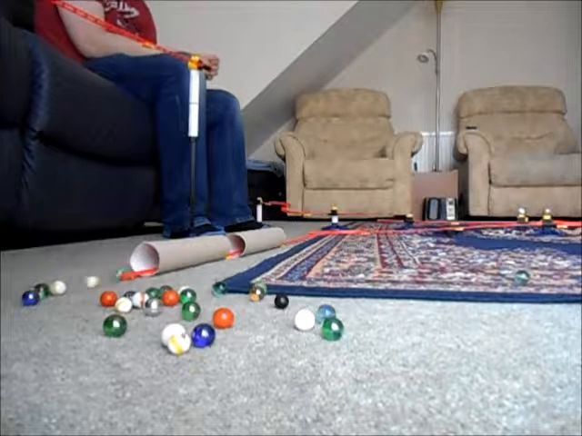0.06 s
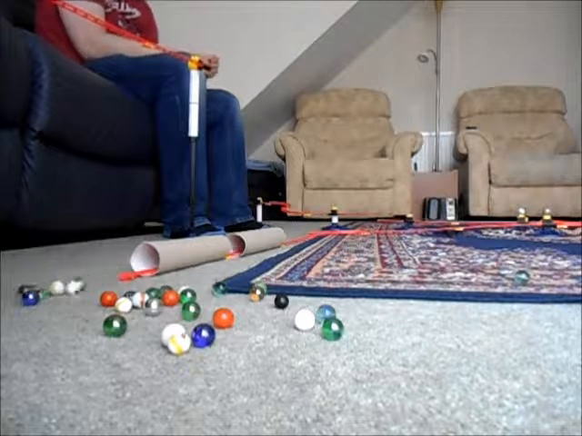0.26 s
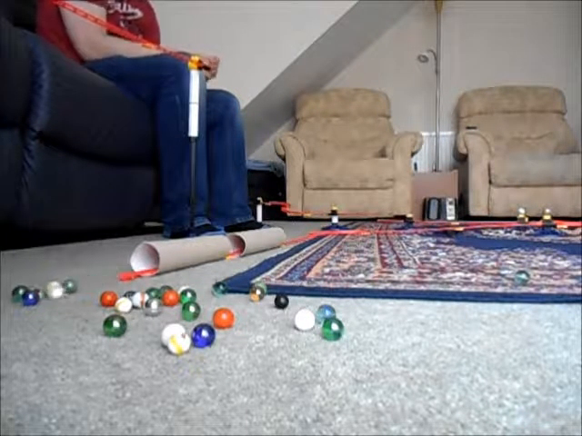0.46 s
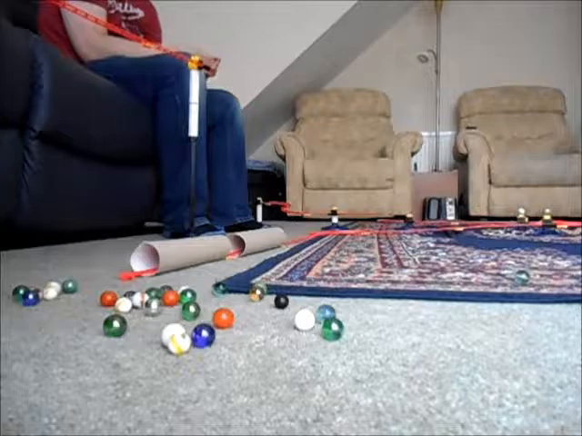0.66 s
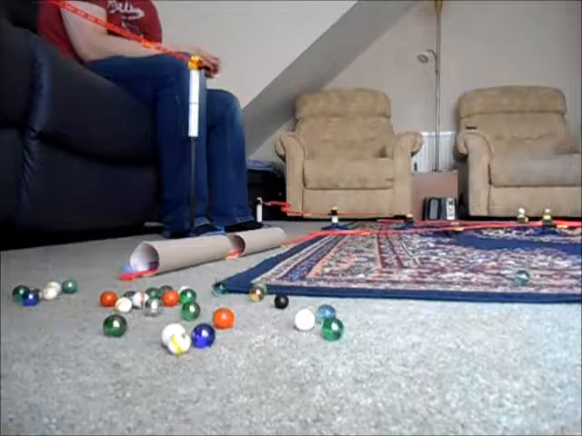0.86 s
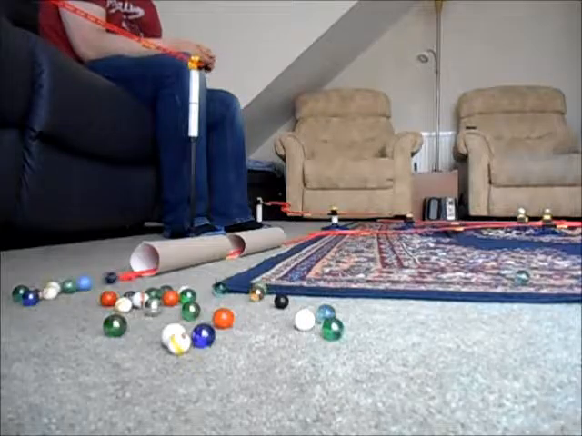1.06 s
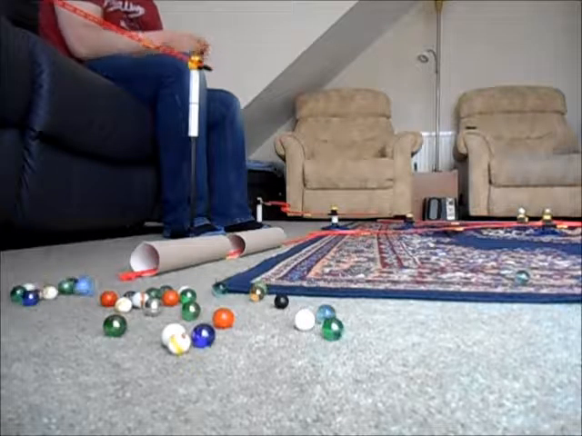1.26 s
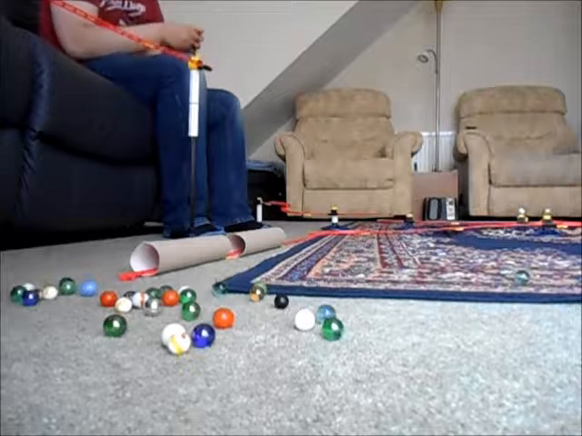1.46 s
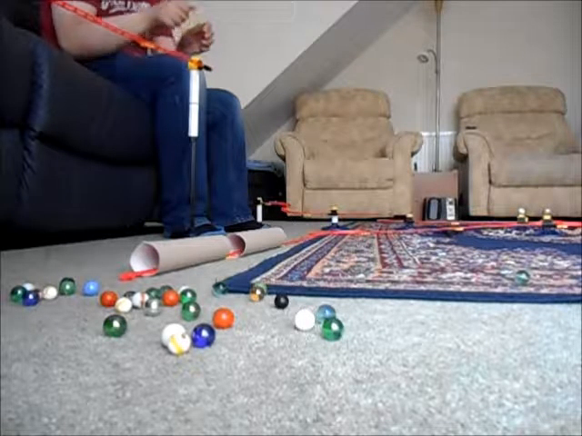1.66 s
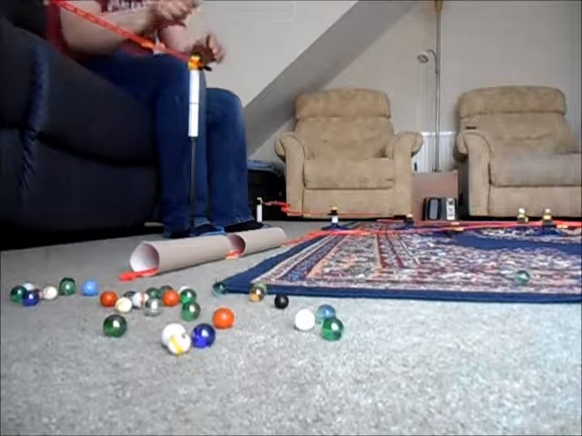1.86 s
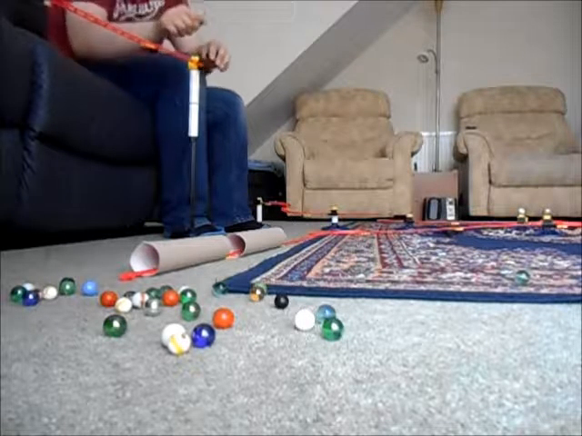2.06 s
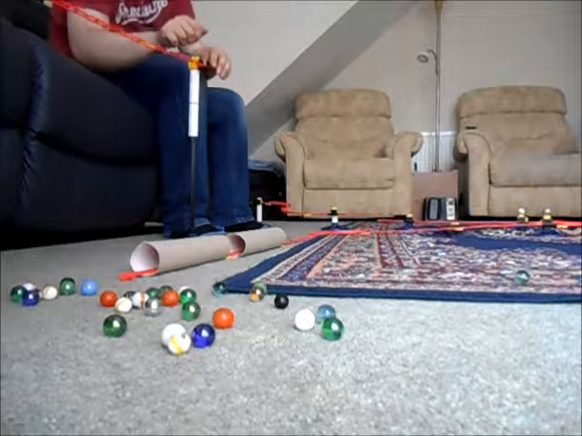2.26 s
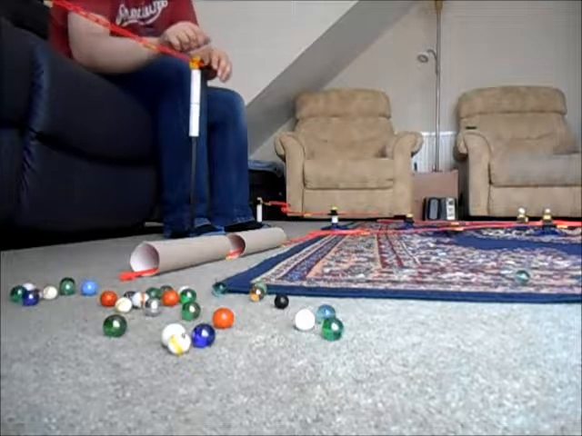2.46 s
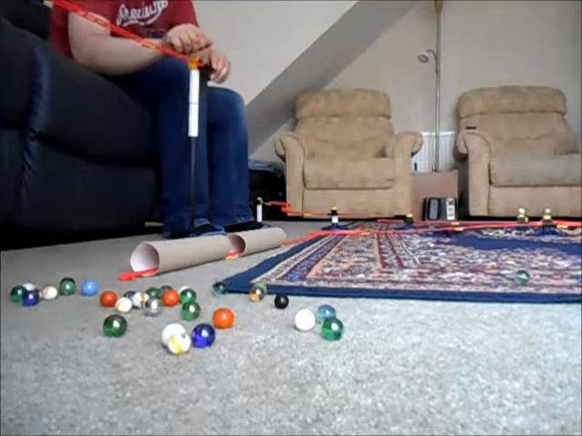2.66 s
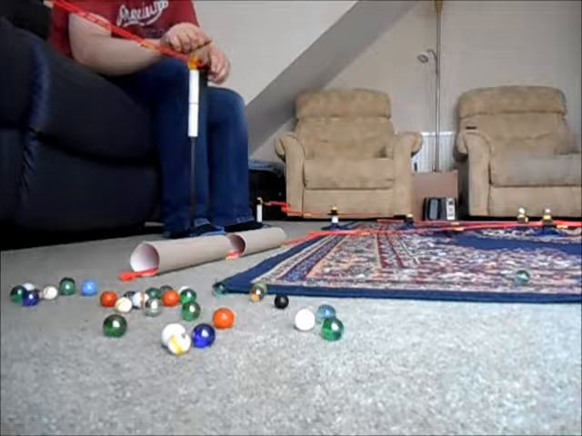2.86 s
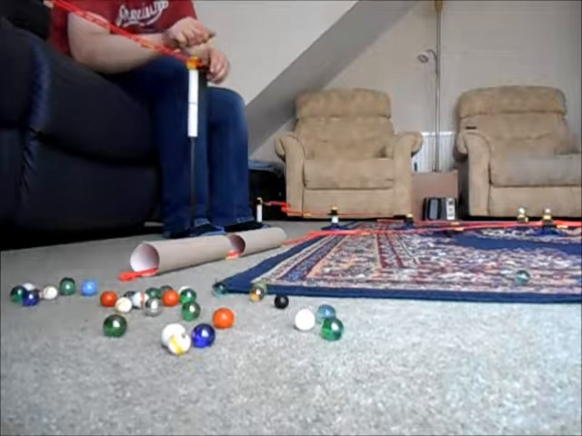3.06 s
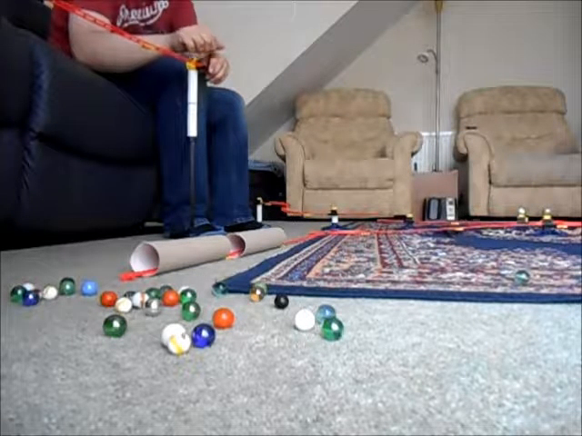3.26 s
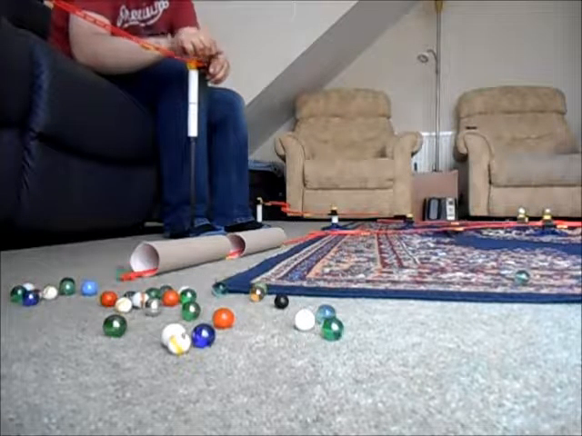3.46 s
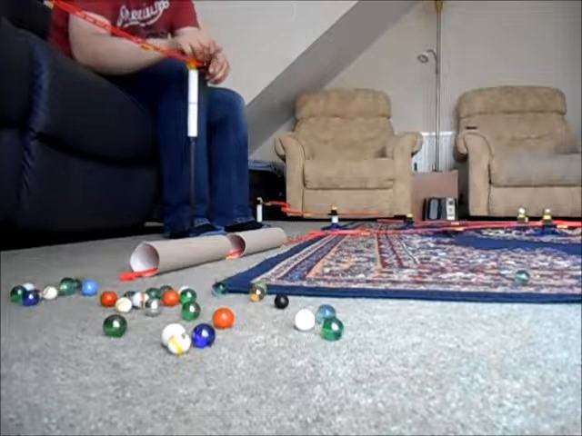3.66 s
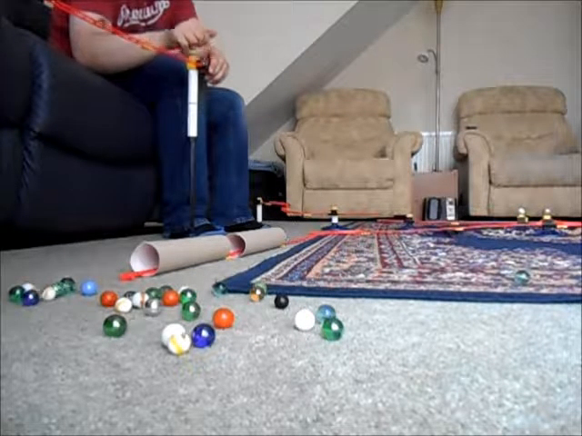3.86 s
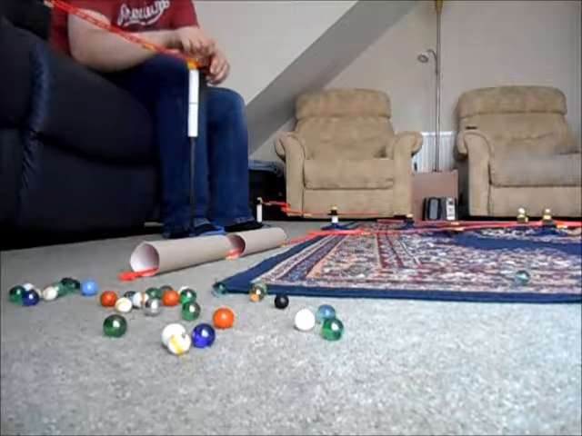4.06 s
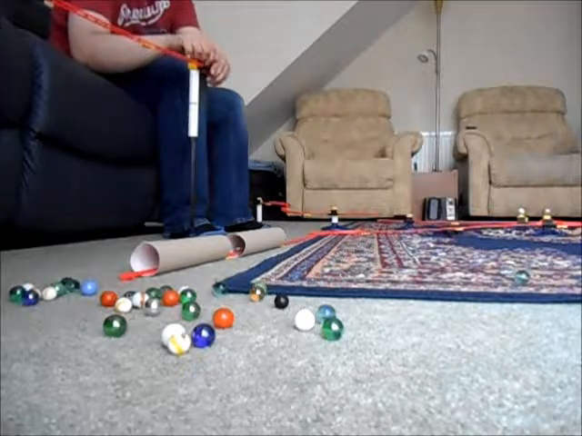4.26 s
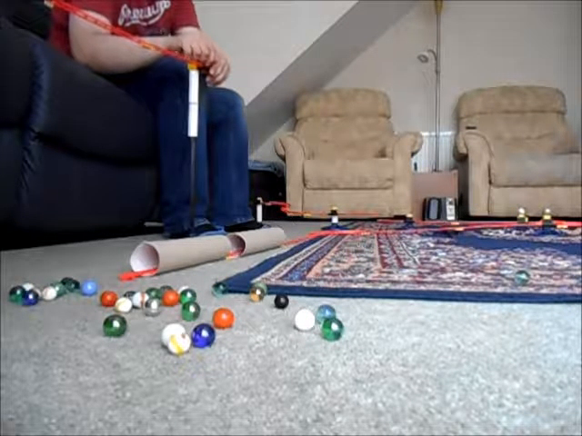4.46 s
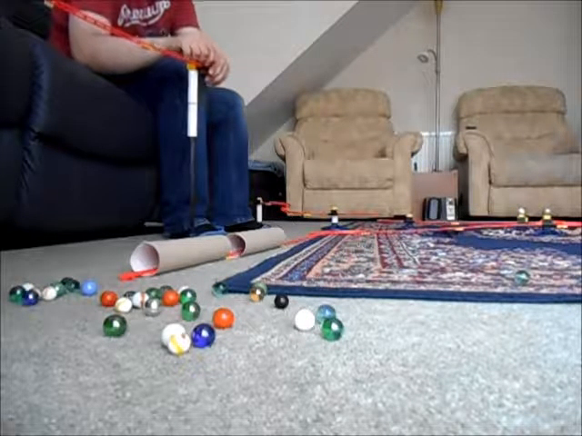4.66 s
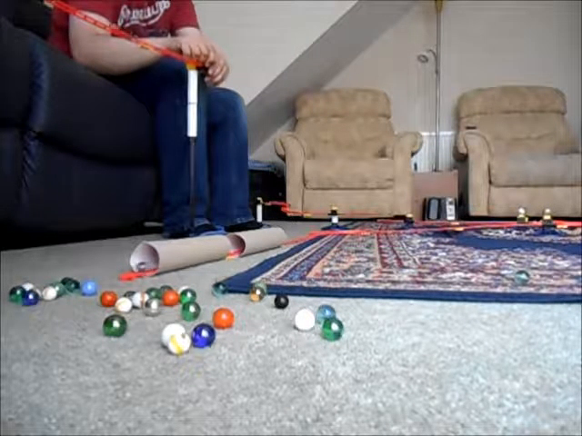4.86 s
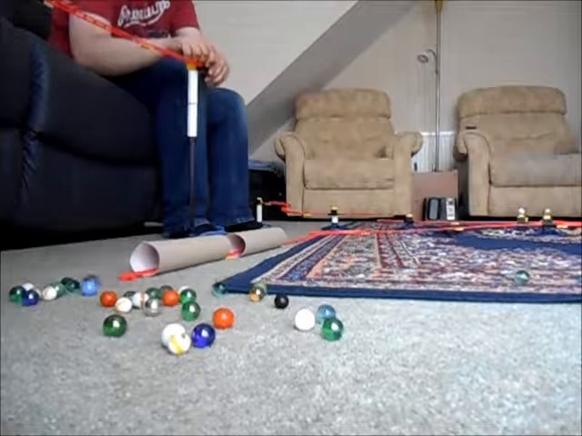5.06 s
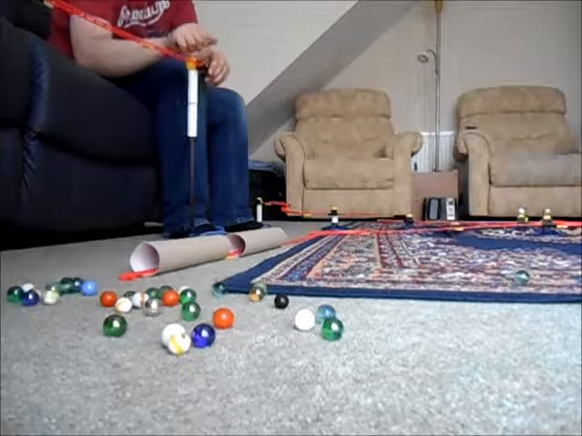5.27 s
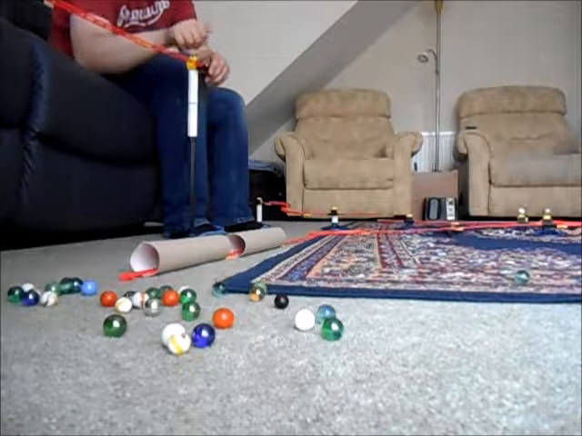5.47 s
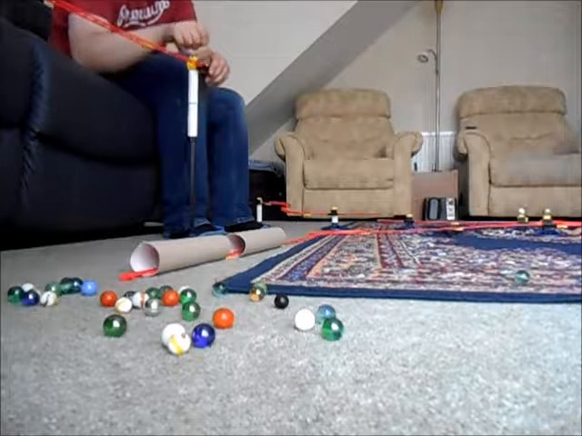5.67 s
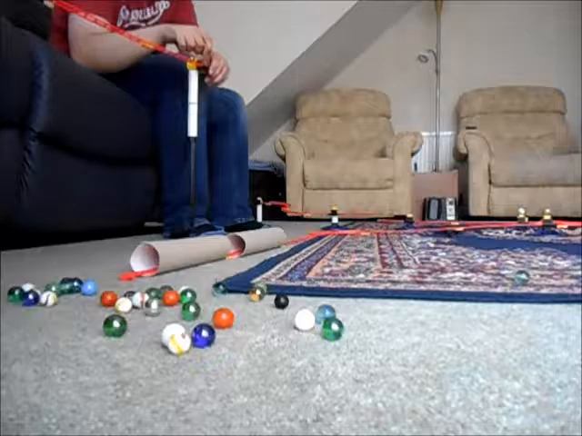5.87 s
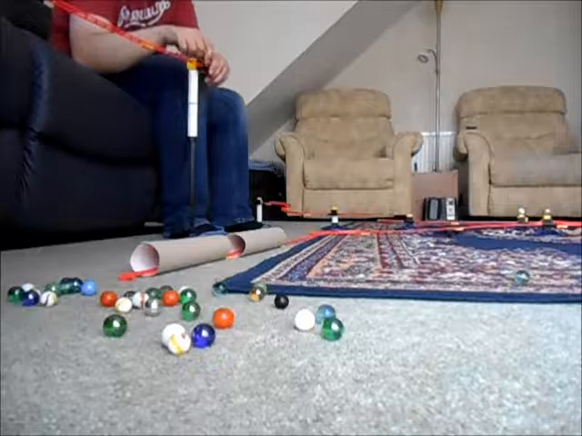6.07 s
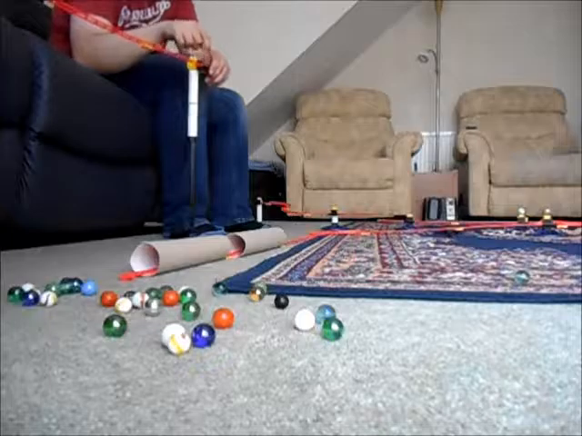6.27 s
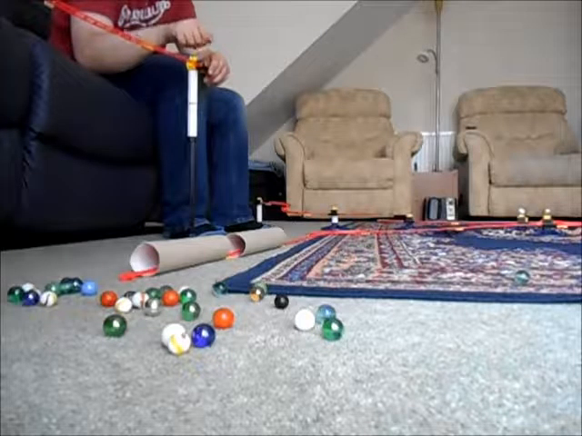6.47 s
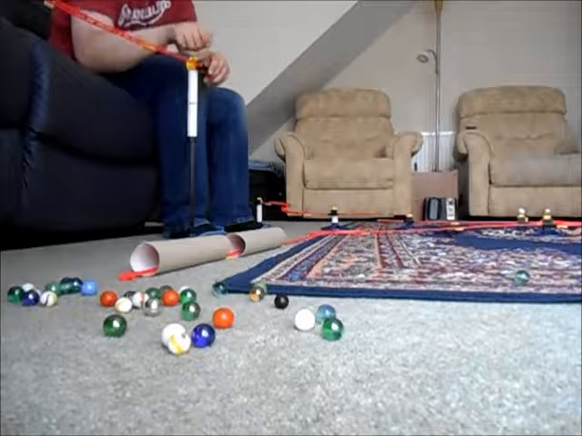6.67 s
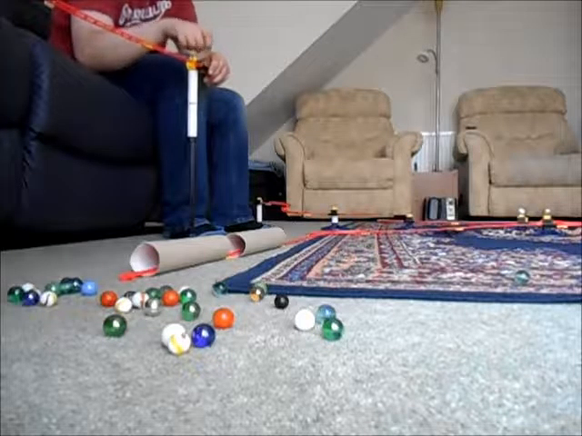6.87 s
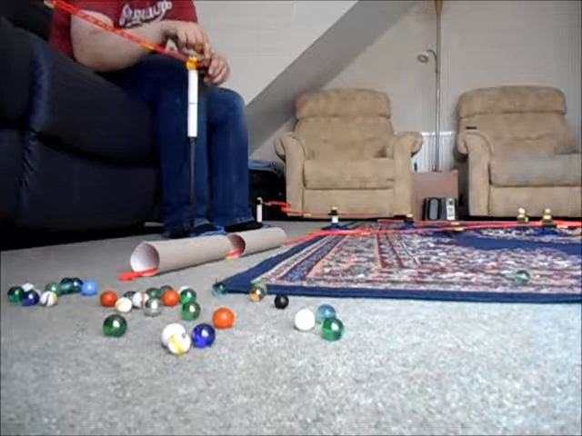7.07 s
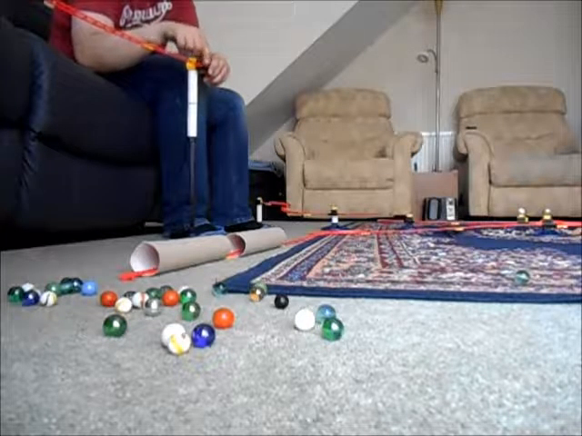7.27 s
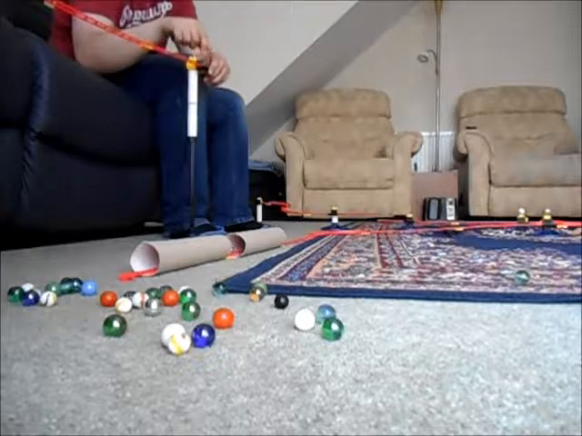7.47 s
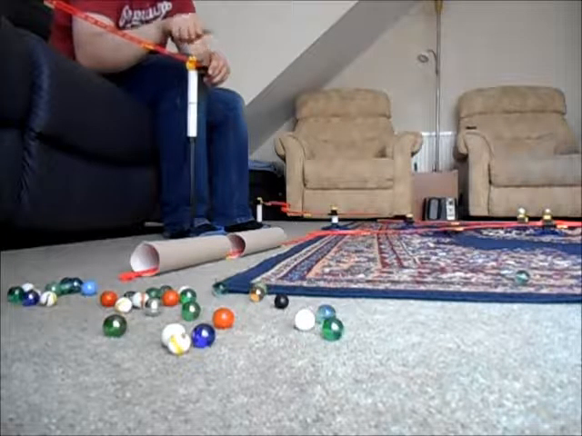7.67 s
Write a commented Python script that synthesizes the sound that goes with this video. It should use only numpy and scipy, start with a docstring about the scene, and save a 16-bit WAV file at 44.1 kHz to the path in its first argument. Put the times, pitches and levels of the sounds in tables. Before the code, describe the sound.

Glass marbles roll through cardboard tubes and a plastic track with a steady gritty hiss, clicking sharply together on carpet in a living room.

```python
"""A carpeted living room: glass marbles are fed by hand into a plastic track, roll through cardboard tubes and
run out onto a carpet, clicking close to the mono microphone; clacks on the track sound with their own echoes.
Clicks are sharp pushes of air with skids, knocks, pings and a noisy room tail; rolling is uneven noise through
the tubes, track, ramp, glass and floor. Decaying sines make the rail, clamp and tube ring; a low wash lies below."""
import sys
import numpy as np
from scipy import signal
from scipy.fft import rfft, irfft, next_fast_len
from scipy.io import wavfile
from scipy.ndimage import uniform_filter1d, map_coordinates

SR = 44100
rng = np.random.default_rng(int(sys.argv[2]) if len(sys.argv) > 2 else 0)


def file_out(sig):
    """Save sig as 16-bit WAV at sys.argv[1]."""
    # one column per channel
    cols = np.atleast_2d(sig).T
    # limit, then scale
    lim = np.clip(cols, -1, 1)
    pcm = np.round(lim * 32767).astype(np.int16)
    wavfile.write(sys.argv[1], SR, pcm)


N = 340452
MID_ROLL_DB = -47  # reference level for the floor rumble and the upper roar


def amp(db):
    """Decibels to amplitude."""
    return 10 ** (np.asarray(db) / 20)


def unit(x):
    """Scale to an RMS of 1."""
    return x / np.sqrt(np.mean(x ** 2) + 1e-20)


def filtered(x, response):
    """x times a complex response of frequency."""
    m = next_fast_len(len(x) + 2048)
    return irfft(rfft(x, m) * response(np.fft.rfftfreq(m, 1 / SR)), m)[:len(x)]


def resonance(f, hz, width_hz):
    """One damped mode, gain 1 at its centre."""
    return 1j * f * width_hz / (hz * hz - f * f + 1j * f * width_hz)


def modes(table):
    """Response of a body with several modes, their powers added: rows (Hz, width Hz, dB)."""
    def response(f):
        return np.sqrt(sum(abs(amp(db) * resonance(f, hz, width)) ** 2 for hz, width, db in table))
    return response


def wash(table):
    """Response of a broad band, its (Hz, dB) points joined on a log frequency axis."""
    hz, db = np.transpose(table)

    def response(f):
        return amp(np.interp(np.log(f + 1), np.log(hz + 1), db))
    return response


def clicks(rows, echo_db, scrape_db, scrape_t60, knock_width_hz, ping_db, t60):
    """Glass on glass is one sharp push of air with no ring; it knocks and pings what lies under it and wakes the room."""
    # Echoes off furniture and walls: delays [s]
    echo_s = [.0034, .0055, .0085, .0125, .0196, .0229, .0274]
    out, t = np.zeros(N + SR), np.arange(SR // 4) / SR
    lead = 40  # samples kept ahead of the push, as its symmetrical filter also spreads backwards
    echo_samples = np.round(np.multiply(echo_s, SR)).astype(int)
    for s, db, click_hz, knock_db, knock_hz, room_db in rows:
        paths = np.zeros(len(t))
        paths[0] = 1
        paths[echo_samples] = amp(echo_db + rng.normal(0, 1.6, len(echo_s)))

        # weak touches are glancing: less push, a stronger and longer skid
        glancing = np.clip((-db - 12.5) / 14, 0, 1)
        skid_decay = amp(-60 / (scrape_t60 * (1 + 0.53 * glancing)) / SR)
        skid = amp(scrape_db - 3.87 * (1 - glancing)) * signal.lfilter([1], [1, -skid_decay], paths)

        spiky_db = 1.5 * rng.standard_normal(len(t)) * np.exp(-t / 0.01)  # single echoes stand out at first
        room = amp(room_db - 60 * t / t60 + spiky_db) * (1 - np.exp(-(t / 0.0075) ** 2))
        push = amp(-7 * glancing) * paths + np.hypot(skid, room) * rng.standard_normal(len(t))

        def colour(f):
            click = 2.75 * abs(resonance(f, click_hz, 6600)) ** 3
            knock = 4.36 * amp(knock_db) * abs(resonance(f, knock_hz, knock_width_hz)) ** 3
            ping = resonance(f, knock_hz, 350) + 0.48 * resonance(f, 1.39 * knock_hz, 330)
            return np.hypot(click, knock) + amp(knock_db + ping_db) * ping

        start = round(s * SR) - lead + 12
        out[start:][:len(t) + lead] += amp(db) * filtered(np.pad(push, (lead, 0)), colour)
    return out[:N]


def carpet_pile():
    """Marbles meet on the carpet, close to the microphone: bright pushes with short skids."""
    # Marbles meeting: (time [s], click level [dB], knock pitch [Hz])
    meetings = [(0.5961, 3.5, 4300), (1.2733, 0, 2750), (1.343, -7.5, 3700), (3.764, 0, 2600),
                (3.8037, -6, 2900), (4.5878, -8, 3500), (5.2217, 1.5, 2860), (5.2447, 3, 2840)]
    # Level of each echo, before random variation [dB]
    echo_db = [-13, -13, -44, -44, -12.5, -31, -16]
    rows = [(s, db, 9265.5, -17, knock_hz, -36) for s, db, knock_hz in meetings]
    return clicks(rows, echo_db, scrape_db=-17.0, scrape_t60=0.0095, knock_width_hz=4700, ping_db=-8, t60=0.32)


def rattle_touches():
    """Jostling marbles make quick runs of small touches, uneven in time, level and pitch."""
    # Runs: (start [s], length [s], middle touch level [dB], middle knock setting [dB], middle knock pitch [Hz])
    rattles = [(0.234, 0.043, -20.5, -9.5, 4700), (0.272, 0.033, -21.5, -8, 4800),
               (0.296, 0.034, -16.5, -10.5, 5100), (0.38, 0.047, -16.5, -10, 4600),
               (0.442, 0.042, -12.5, -13, 4770), (0.598, 0.031, -17, -6.5, 4640),
               (0.645, 0.034, -15.5, -9, 4930), (0.732, 0.042, -24.5, -8, 4630),
               (0.887, 0.03, -36, -6, 3680), (1.058, 0.026, -36, -3.5, 4330),
               (1.134, 0.022, -25, -15, 4700), (1.185, 0.03, -21, -23, 4650), (2.864, 0.04, -19, -13, 4270),
               (2.951, 0.026, -31.5, -13, 4400), (3.651, 0.04, -29.5, -1.5, 3200),
               (4.297, 0.24, -32, -16, 3680), (4.662, 0.34, -23, -17, 3180), (5.079, 0.04, -31.5, -4, 3500),
               (6.129, 0.027, -34, -17, 3200), (6.194, 0.08, -24, -7, 2930), (6.298, 0.05, -28, -22, 3400),
               (6.484, 0.051, -31, -3, 4350), (7.382, 0.032, -25, -3.5, 3330)]
    touches = 9  # in each run
    run_fade_db = -6.5  # slope over the whole run length
    rows = []
    for s, span, db, knock_db, knock_hz in rattles:
        when, size = rng.random(touches), rng.standard_normal((touches, 3))
        for k, (level, knock, pitch) in enumerate(size):
            time = s + span * (k + when[k]) / touches
            touch_db = db + run_fade_db * (k / touches - 0.5) + 0.5 * level
            rows.append((time, touch_db, knock_db + 3 * knock, knock_hz * (1 + 0.08 * pitch), -24.5))
    return rows


def clatter():
    """Marbles clack in the hand, on the track and at its joints; weaker touches have a lower click centre."""
    # Single clacks: (time [s], click level [dB], knock setting [dB], knock pitch [Hz])
    clacks = [(0.1542, -13, -20, 4100), (0.229, -6.5, -6, 5500), (0.2701, -21, -19, 3700),
              (0.2875, -18, -10, 4740), (0.308, -11, -14, 4750), (0.3906, -9, -23, 4600),
              (0.438, -11, -11, 4200), (0.442, -2, -13.5, 3830), (0.4564, -9.5, -18, 5000),
              (0.616, -16, -9, 4260), (0.6352, -2.5, -18, 4500), (0.6485, -2.5, -13, 5100),
              (0.6674, -23, -3, 5030), (0.7265, -9, -8, 5240), (0.8877, -14, -14, 3570),
              (0.9598, -13, -11.5, 3950), (1.0558, -25, -2, 3400), (1.1258, -17, -9, 3520),
              (1.1351, -7, -19, 4830), (1.1465, -19, -20, 4700), (1.175, -20, -20, 3700),
              (1.185, -8.5, -10, 4700), (2.512, -28, -9, 3600), (2.8637, -23, -25, 3760),
              (2.8702, -22, -3, 4100), (3.6391, -1.5, -3, 3560), (3.644, -10.5, 0, 3230),
              (3.6938, -13.5, -18, 3470), (4.23, -11, -16.5, 3200), (4.2862, -17, -11, 3100),
              (4.3458, -21, -17, 3600), (4.3906, -22.5, -11, 4000), (4.4646, -22, -14, 4100),
              (4.481, -21, -6, 3600), (4.506, -29, -7, 3500), (4.5252, -16, -5, 2850),
              (4.5645, -19, -16, 3100), (4.6217, -27, -18, 3300), (4.6444, -11.5, -16, 2500),
              (4.701, -26, -22, 2980), (4.4057, -26, -9, 3700), (4.4362, -25, -4, 3400),
              (4.538, -27, -13, 3380), (4.7537, -26, -22, 3780), (4.8522, -19, -21, 3500),
              (4.905, -20, -10, 2810), (4.994, -22, -20, 2370), (5.036, -14, -25, 2250),
              (5.058, -11, -7, 4670), (5.0809, -9, -12, 4070), (5.1071, -23, -13, 3480),
              (5.134, -14, -22, 4000), (5.1692, -17, -16, 3700), (5.4109, -17.5, -6, 3340),
              (5.551, -23.5, -20, 3500), (5.6676, -28, -7, 3080), (5.7209, -17, -8, 3570),
              (6.1407, -22, -23, 3000), (6.1485, -21, -21, 3200), (6.1914, -3.5, -7.5, 4170),
              (6.2048, -23, 0.5, 2920), (6.228, -18, -1.5, 2970), (6.454, -28.5, -2, 4940),
              (6.4832, -25, 0.5, 4100), (6.5107, -21, 0.5, 4700), (6.921, -22, -11, 3000),
              (7.3787, -10, -2.5, 4540), (7.3823, -8.5, -9, 3170), (7.678, -18.5, -1, 3380)]
    # Level of each echo, before random variation [dB]
    echo_db = [-14, -31, -14, -9, -11, -14.5, -23.5]
    click_hz, brighter_hz_per_db = 8882.1, 38.34  # click centre at 0 dB, and its rise with level
    touches = [(*clack, -32.5) for clack in clacks] + rattle_touches()
    rows = [(s, db, click_hz + brighter_hz_per_db * db, *rest) for s, db, *rest in touches]
    return clicks(rows, echo_db, scrape_db=-8.5, scrape_t60=0.011, knock_width_hz=5100, ping_db=11.5, t60=0.24)


def pings():
    """The plastic rail rings for a few milliseconds in two modes."""
    # A marble against the rail: (time [s], level [dB], lower mode [Hz])
    rail_pings = [(5.301, -29.5, 3550), (5.405, -31, 3600), (5.411, -29, 3200), (5.423, -31, 4600),
                  (5.7205, -29, 3580), (7.678, -58, 3400), (7.678, -29, 2780)]
    out, t = np.zeros(N + SR), np.arange(SR // 20) / SR
    for s, db, hz in rail_pings:
        ring = np.sin(2 * np.pi * hz * t) + 0.39 * np.sin(2 * np.pi * 1.5 * hz * t)
        envelope = amp(db - 60 * (t / 0.01) ** 2) * (1 - np.exp(-t / 0.00015))
        out[round(s * SR):][:len(t)] += envelope * ring
    return out[:N]


def clamp():
    """A small, loose metal part of the ramp rings roughly, its modes at new strengths with each touch."""
    # Modes of the clamp: (pitch [Hz], level before variation [dB], time to fall 60 dB [s])
    clamp_modes = [(4070, -14, .08), (4570, -10, .15), (5880, 3, 0.27), (6500, 1, 0.11), (8360, -6, .09),
                   (9700, -6, 0.13)]
    # A marble rattles it: (time [s], level [dB])
    clamp_hits = [(2.862, -37), (2.871, -32.5), (2.879, -34), (2.957, -41.5)]
    out, t = np.zeros(N + SR), np.arange(SR // 4) / SR
    for s, db in clamp_hits:
        for hz, mode_db, t60 in clamp_modes:
            drift = 0.14 * np.cumsum(rng.standard_normal(len(t)))  # wandering phase roughens the tone
            envelope = amp(db + mode_db + rng.normal(0, 2.3) - 60 * t / t60)
            out[round(s * SR):][:len(t)] += envelope * np.sin(2 * np.pi * hz * t + drift)
    return out[:N]


def wobble(rate):
    """A smooth random curve, rate knots a second."""
    return map_coordinates(rng.standard_normal(int(N * rate / SR) + 4), [np.arange(N) * rate / SR])


def grit():
    """Tiny bumps under a rolling ball: noise of uneven sizes; its level flutters and its colour drifts in patches."""
    flutter_db = 0.96 * (wobble(6) + wobble(30))
    bumps = rng.standard_normal(N) * amp(3.24 * rng.standard_normal(N) + flutter_db)
    spectra = signal.stft(bumps, nperseg=1024)[2]
    across_pitch = uniform_filter1d(rng.standard_normal(spectra.shape), size=3, axis=0)
    patches = uniform_filter1d(across_pitch, size=20, axis=1)
    return signal.istft(spectra * amp(2.4 * unit(patches)), nperseg=1024)[1][:N]


def rolled(body, level_db, ticks=0):
    """The bumps of rolling drive one body, heard at a changing level."""
    return amp(level_db) * unit(filtered(grit() + ticks, body))


def level_curves(table):
    """One level curve for each column after the time, joined by straight lines in dB."""
    s, *columns = np.transpose(table)
    return [np.interp(np.arange(N) / SR, s, db) for db in columns]


def rolling_in_tubes():
    """Marbles inside the tubes drive the cardboard and its air column; a louder roar is also brighter."""
    # Rolling, cut short when a marble leaves: (time [s], cardboard roar [dB], song of the air column [dB])
    in_tubes = [(0, -41.5, -50.5), (0.3, -45, -48.5), (0.75, -42, -47.5), (1.119, -44.5, -47.5),
                (1.14, -48.5, -58), (1.4, -50, -56.5), (2.0, -46, -49.5), (2.3, -47.5, -49),
                (2.75, -46, -56.5), (2.95, -44, -47), (3.45, -43.5, -48.5), (3.7, -46, -51.5),
                (4.3, -45, -52.5), (4.95, -43, -49), (5.1, -43, -54), (5.12, -56.5, -59.5), (5.6, -53, -55),
                (6.45, -46, -50.5), (7.0, -47, -54.5), (7.72, -46, -48)]
    # Air column: (centre [Hz], width [Hz], relative level [dB])
    air_modes = [(635.7, 25, 0), (824, 7.3, -4), (1271.3, 20, 4), (1431, 27, -6), (1806, 13, -24.5)]
    # Cardboard wall: (frequency [Hz], relative level [dB])
    roar_band = [(400, -29.5), (600, -15.5), (1150, -6), (1450, -1), (1700, -1), (1950, -5), (2300, -13.5),
                 (3000, -30), (5000, -74)]
    # Upper band of the cardboard: (centre [Hz], width [Hz], relative level [dB])
    upper_band = [(1896, 690, 0)]
    roar_db, song_db = level_curves(in_tubes)
    upper_db = -55 + 2.26 * (roar_db - MID_ROLL_DB)  # grows faster than the rest
    return rolled(modes(air_modes), song_db) + rolled(wash(roar_band), roar_db) + rolled(modes(upper_band), upper_db)


def rolling_in_open():
    """Marbles in the open hiss at the glass contact and whirr on the track; the floor rumbles along with the hiss."""
    # Rolling: (time [s], glass hiss [dB], track whirr [dB])
    in_open = [(0, -44.5, -44), (0.5, -50, -41.5), (1.2, -54, -46.5), (1.55, -54, -47.5),
               (1.95, -58.5, -49.5), (2.2, -49.5, -45.5), (2.6, -55.5, -47.5), (3.0, -54, -48),
               (3.5, -53.5, -46), (4.2, -48.5, -45), (4.45, -47, -43), (4.95, -46, -44), (5.2, -40.5, -42),
               (5.6, -43.5, -44.5), (6.1, -41.5, -45.5), (6.701, -43.5, -43), (7.2, -39, -42.5),
               (7.72, -40, -41)]
    # Glass contact, track and floor: (frequency [Hz], relative level [dB])
    hiss_band, whirr_band, rumble_band = [(3500, -14), (5500, 5), (6500, 6.5), (8500, 8), (9800, 3),
                                          (11000, -6)], [(1500, -15.5), (2300, 0), (3300, 0.5), (4500, -3.5),
                                                        (5800, -7), (7500, -15.5)], [(120, -48), (210, -0.5), (300, 2),
                                                                       (480, -1), (700, -4.5), (1050, -8.5),
                                                                       (1500, -33)]
    hiss_db, whirr_db = level_curves(in_open)
    rumble_db = -59 + 0.56 * (hiss_db - MID_ROLL_DB)  # takes a share of the hiss's swings
    # specks of dirt tick against the glass, about 90 a second
    ticks = (rng.random(N) < 90 / SR) * amp(23.5 + rng.normal(0, 1.7, N))
    hiss = rolled(wash(hiss_band), hiss_db, ticks)
    return hiss + rolled(wash(whirr_band), whirr_db) + rolled(wash(rumble_band), rumble_db)


def passes(rows):
    """Level in dB: rise, hold, fall for each pass over a faint idle."""
    fade_s, idle_db = 0.097, -62
    t = np.arange(N) / SR
    power = amp(2 * idle_db)
    for s, span, db in rows:
        gate = np.interp(t, [s - fade_s, s, s + span, s + span + fade_s], [0, 1, 1, 0])
        power = power + amp(2 * db) * gate ** 2
    return 10 * np.log10(power)


def singing_parts():
    """A marble sets the track or the ramp singing in its modes while it is on it."""
    # Passes over each part: (start [s], length [s], level [dB])
    on_track, on_ramp = [(4.3, 0.7, -53), (5.5, 0.59, -50), (6.0, 0.9, -57), (7.15, 0.36, -44)], [(0, 0.55, -51), (2.05, 0.3, -47.5), (4.0, 1.3, -56),
                                           (5.4, 6.2, -55)]
    # Modes of each part: (centre [Hz], width [Hz], relative level [dB])
    track_modes, ramp_modes = [(2400, 78, 0), (2916, 100, 10.5), (4600, 120, 5.5), (7280, 180, -1)], [(3720, 100, 3.5), (3800, 100, 4), (5040, 150, 0),
                                              (6700, 240, -6), (8550, 620, 0)]
    return rolled(modes(track_modes), passes(on_track)) + rolled(modes(ramp_modes), passes(on_ramp))


def thuds():
    """A marble drops on a tube: the cardboard wall booms briefly in two low modes and a weaker high one."""
    # Drops: (time [s], level setting [dB], main mode [Hz])
    drops = [(.305, -43, 240), (2.88, -45, 255), (3.642, -44.5, 297), (4.485, -38.5, 629), (4.50, -45, 409),
             (5.0, -43, 863), (6.15, -47, 282), (7.379, -41.5, 333)]
    out, t = np.zeros(N + SR), np.arange(SR // 3) / SR
    for s, db, hz in drops:
        boom = sum(gain * np.sin(2 * np.pi * ratio * hz * t) for ratio, gain in [(1, 1), (0.87, 0.7), (2.9, 0.24)])
        envelope = amp(db - 2 - 60 * t / 0.23) * (1 - np.exp(-t / 0.0016))
        out[round(s * SR):][:len(t)] += envelope * boom
    return out[:N]


def still_room():
    """The still room and the microphone leave a faint low wash of filtered noise under everything."""
    # Wash: (frequency [Hz], relative level [dB])
    air_band = [(15, 20), (28, 2), (50, -5), (100, -3), (200, -39), (300, -47)]
    return amp(-69.5) * unit(filtered(rng.standard_normal(N), wash(air_band)))


def scene():
    """All sources meet at the one microphone, the same on both channels."""
    marbles = carpet_pile() + clatter() + pings() + clamp()
    rolling = rolling_in_tubes() + rolling_in_open() + singing_parts()
    return np.tile(marbles + rolling + thuds() + still_room(), (2, 1))


def record(dry):
    """The input rounds off the hardest clacks; the camera's band ends in a steep slope."""
    full_scale, top_hz = 0.8, 10450
    rounded = dry / (1 + abs(dry / full_scale) ** 6) ** (1 / 6)

    def edge(f):
        return 1 / np.sqrt(1 + (f / top_hz) ** 108) * (f < 1.3 * top_hz)
    return np.array([filtered(side, edge) for side in rounded])


dry = scene()
out = record(dry)
file_out(out)
```